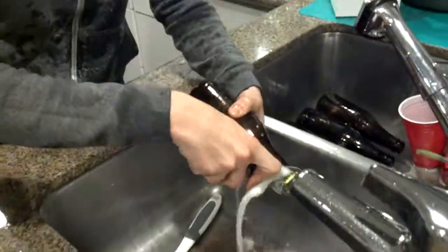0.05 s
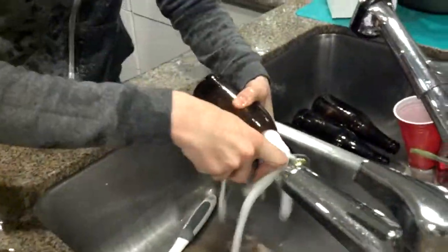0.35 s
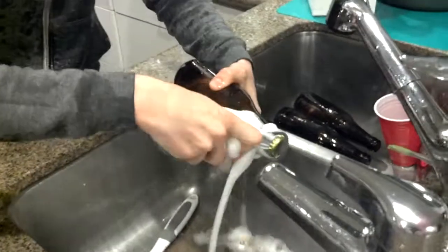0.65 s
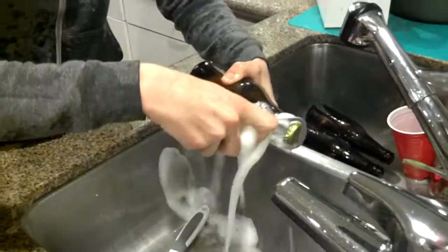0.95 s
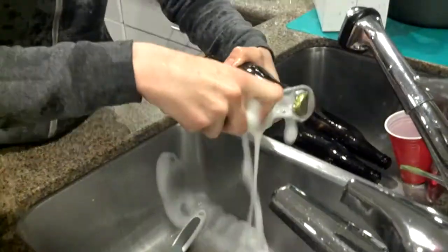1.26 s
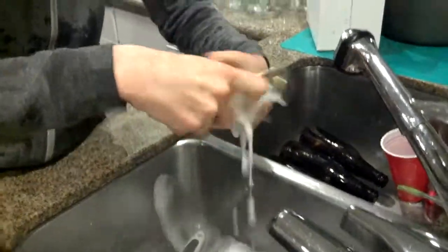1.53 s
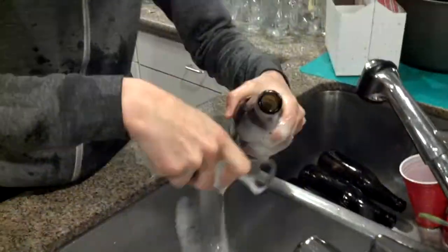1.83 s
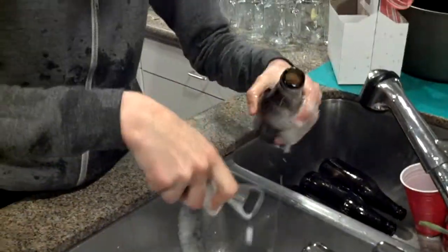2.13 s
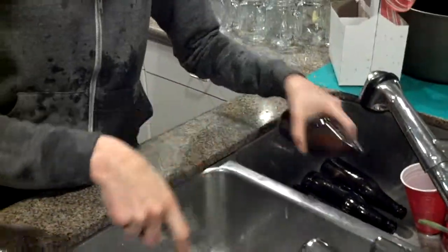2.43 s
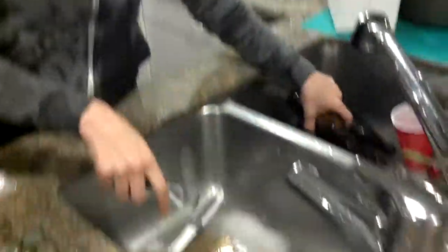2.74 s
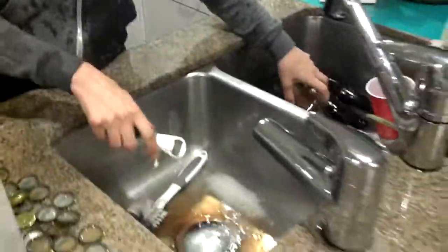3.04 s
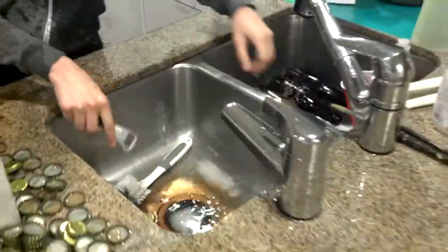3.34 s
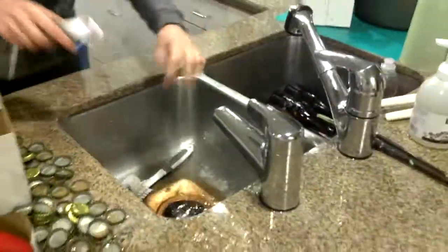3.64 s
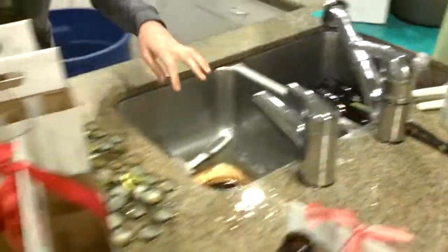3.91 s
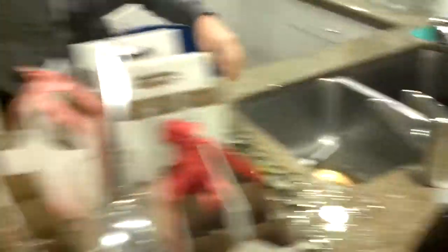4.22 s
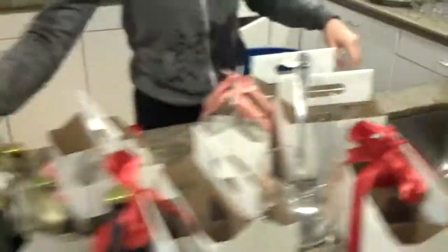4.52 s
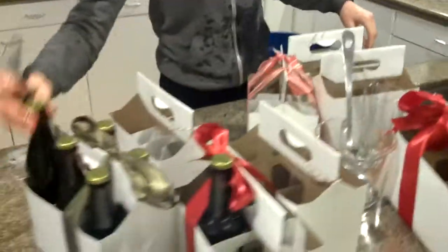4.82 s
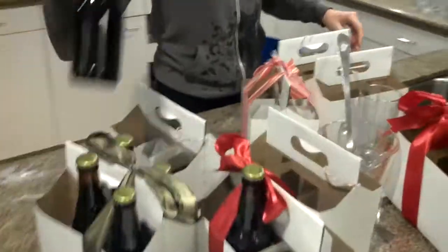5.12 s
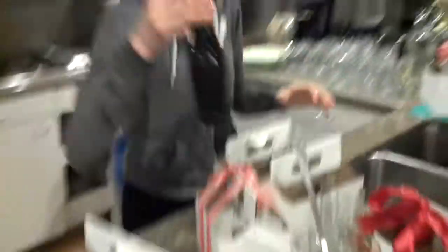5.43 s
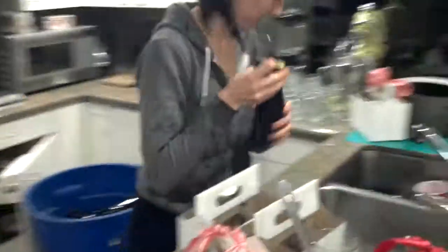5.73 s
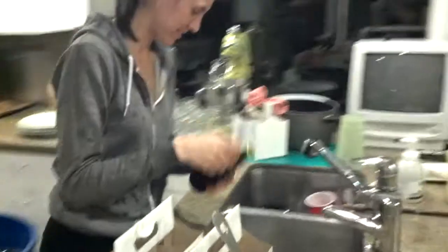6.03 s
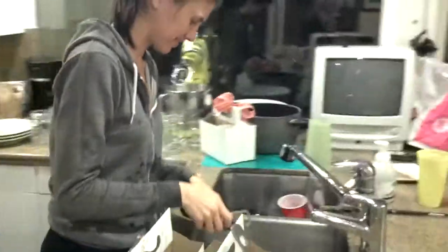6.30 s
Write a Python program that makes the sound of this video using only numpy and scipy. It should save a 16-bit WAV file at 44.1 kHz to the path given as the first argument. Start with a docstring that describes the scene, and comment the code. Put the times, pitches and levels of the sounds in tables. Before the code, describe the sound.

From the start, gas hisses past the cap of an over-carbonated glass bottle, close by, while a thin stream splatters into a steel sink. Gushes drum on the metal at about 0.7, 1.0 and 1.3 seconds, with spits of gas and a wetter surge of hiss. At 1.5 seconds the cap pops off sharply and the hiss stops. From 1.9 to 2.7 seconds the cap bounces and rings around the basin while foam fizzes softly. Between 2.7 and 3.4 seconds the bottle knocks and rocks loudly on other bottles, the basin ringing beneath, and the fizz fades. The rest is quieter: sleeves brush and tap cardboard cartons from about 4.5 seconds, a full bottle clinks at 4.7, an opener taps its neck at 5.8, then skids and bites on the cap at 6.2 and 6.4. The stereo is wide, with short small-kitchen reverberation.

```python
"""Foaming bottle over a steel sink.

An over-carbonated bottle is eased open: gas jets past the cap and overflow drums on the steel.
The cap pops off and bounces in the basin. The foaming bottle knocks and rocks on a pile of others.
A full one is lifted from its carton and an opener clinks on its neck, all in a small kitchen.
The microphone pair is widened by a delayed, inverted crossfeed."""
import sys
import numpy as np
from scipy import signal
from scipy.fft import rfft, irfft, next_fast_len
from scipy.io import wavfile

SR = 44100
rng = np.random.default_rng(int(sys.argv[2]) if len(sys.argv) > 2 else 0)


def store_pcm(level_fs):
    """Save levels as 16-bit WAV."""
    pcm = np.round(np.clip(level_fs, -1, 1) * 32767).astype(np.int16)
    wavfile.write(sys.argv[1], SR, np.atleast_2d(pcm).T)


N = 285106
TIME_S = np.arange(N) / SR
EDGES_HZ = 28 * 2 ** (np.arange(24) * .4)
CENTRES_HZ = np.sqrt(EDGES_HZ[1:] * EDGES_HZ[:-1])
POP_S = 1.4898

# Noise spectra: freq_hz, density_db
AIR_SPECTRUM = [(50, -8), (260, 6), (700, -17), (2000, -17), (6000, -32), (16000, -32)]
CLOTH_SPECTRUM = [(40, -30), (130, 0), (500, -5.5), (2000, -19.5), (16000, -35)]
THUD_SPECTRUM = [(50, -4), (200, 7), (600, -12), (1200, -6.5), (2500, -6.5), (6000, -32), (16000, -20)]
TICK_SPECTRUM = [(60, -4), (220, 12), (1000, -11), (2600, -5), (3500, 2.5), (8000, 4.5), (16000, -10)]
GLASS_SPECTRUM = [(1000, -35), (3500, -10), (8000, -3), (15000, 0)]
SINK_SPECTRUM = [(40, -38), (85, -16), (160, 12), (370, -2), (520, 4.5), (700, -4.5), (1250, 1.5),
                 (2000, -10.5), (4200, -5.5), (11000, -18), (16000, -35)]
LANDING_SPECTRUM = [(70, -40), (175, 0), (350, -6), (550, 4), (950, -5), (1300, -1), (1900, -9), (7500, -8),
                    (16000, -19)]
FROTH_SPECTRUM = [(200, -5.5), (800, -15), (2000, -3.5), (4200, 4.5), (7000, 2), (10000, -0.5),
                  (15500, -15)]
DRUM_SPECTRUM = [(50, -44), (90, -23), (140, 3), (400, -20), (2000, -49.5)]
SPLATTER_SPECTRUM = [(450, -35), (780, 0), (1200, -31.5), (4000, -61)]
JET_SPECTRUM = [(100, -24), (400, 0), (750, -3.5), (1100, -8), (1500, -0.5), (2200, -5.5), (4200, 0.5),
                (7000, -1), (10000, -2.5), (15500, -11)]
POP_SPECTRUM = [(60, -26.5), (200, -15), (600, -10), (1300, 1), (2500, -1.5), (4500, -1.5), (8500, -11),
                (16000, -13)]

# Blows: start_s, level_db, bass_db, treble_db
POP_BLOWS = [(.761, -25.5, 3, -7), (1.345, -29.5, -5, -5.5), (1.486, -25, 0, -8), (1.4898, -16.5, -10, -2),
             (1.5185, -22.5, -6, -17)]
PILE_KNOCKS = [(2.740, -20.5, 5, 1), (2.783, -23, -3, 6), (2.795, -21.5, -3, -3), (2.826, -21, 3, -6),
               (2.912, -22, -1, -9.5), (3.009, -15, -6, -3), (3.036, -13, -14, -6.5), (3.092, -21.5, 16, 4),
               (3.267, -25, -11, -5.5), (3.289, -32.5, -13, 2), (3.363, -34, 0, -12),
               (3.527, -42.5, -11, -8), (3.962, -47, -24, -19)]
BODY_CLINKS = [(4.706, -42.5, -2, -3), (4.714, -46.5, -4, -2)]
NECK_CLINKS = [(5.769, -44, 4, 1.9)]
OPENER_HOOK, OPENER_BITE = (6.152, -34, -2, -4), (6.389, -39, -2, 4)
# Bottle rocking on the pile: start_s, level_db, bass_db, treble_db, loss_per_touch_db
PILE_ROCKS = [(2.757, -17, -1, -9, 7.5), (3.135, -21.5, 2, -7, 5.2), (3.320, -28.5, -6, -11, 1.5)]
# Cap landings: start_s, level_db, treble_db, drain_share, cap_ring_db, flat_share
CAP_LANDINGS = [(1.912, -20.5, 0, 0, -8, .6), (1.952, -32, 5, .1, -3, .6), (2.144, -27, -1, .3, -2, .1),
                (2.200, -31.5, -3.5, .5, -1, .3), (2.255, -45, 3, .5, 8, .05), (2.373, -32, -3, .7, -2, .6),
                (2.383, -36, -2, .7, 10.5, 1), (2.442, -33, -5, 1, 1, .7), (2.666, -36, 1, .4, -6, .5)]
# Carton taps, soft low thumps: start_s, level_db
CARTON_TAPS = [(4.568, -55), (5.502, -47), (5.942, -51.5)]
SOFT_THUMPS = [(5.322, -69.5), (6.048, -62)]

# Sleeves brushing cartons: peak_s, level_db, length_s
BRUSH_STROKES = [(4.603, -63, 0.47), (4.85, -56.5, 0.66), (5.325, -58, 0.28), (5.54, -54, 0.61),
                 (6.012, -51.5, 0.35), (6.19, -53, 0.66)]
# Foam at the neck, then from the tipped bottle: peak_s, level_db, rise_s, fall_s
FOAM_SWELLS = [(1.4, -45.5, 1.62, 1.52), (2.68, -46.5, 1.1, .63)]
# Gushes landing on the steel: peak_s, level_db
OVERFLOW_GUSHES = [(.73, -34), (.95, -44), (1.32, -43)]
# First thin stream, fading as foam covers the steel: time_s, level_db
STREAM_ENVELOPE = [(0, -66.5), (.25, -56), (.6, -75.5)]

# Modes of steel and glass: pitch_hz, level_db, t60_s
OPENER_MODES = [(660, -7, 0.12), (3320, -3, 0.09), (3600, -1, 0.1), (4590, -12, 0.13), (6000, -7, 0.08),
                (6834, -6, 0.1), (9900, -7.5, 0.079)]
SEATED_CAP_MODES = [(3660, -4, 0.1), (4450, -2, 0.06), (4680, 1, 0.05), (6000, -8, 0.1)]
EMPTY_BOTTLE_MODES = [(2925, -7, 0.08), (3005, -9, 0.08), (3500, -15, 0.16), (4200, -15, 0.17),
                      (4550, -18, .18), (5260, -15, 0.12), (6940, -19, 0.08)]
PILE_BASIN_MODES = [(117, -13, 0.16), (166, -13, 0.38), (192, -13, .3), (303, -8.5, 0.42), (460, -10, .2),
                    (490, -10, 0.18), (528, -9, 0.17), (930, -11, 0.16), (1098, -15, .14), (1212, -9, 0.15),
                    (1315, -2.5, 0.08), (1715, -14, .1)]
# Full bottle: pitch_hz, body_hit_db, neck_hit_db, t60_s
FULL_BOTTLE_MODES = [(1970, -11, 2, 0.045), (2013, -19, -15, 0.8), (3060, -10, -19, 0.45),
                     (3535, -3, -7, 0.38), (4581, -3, -37, 0.44), (6270, -6, -20, 0.14),
                     (6980, -8, -1, 0.09), (7270, -14, 4, 0.055), (7768, -10, -14, .13),
                     (9722, -18, -4, 0.055), (10470, -19, 0, .04)]
# Basin under the cap: pitch_hz, side_hit_db, drain_hit_db, t60_s
CAP_BASIN_MODES = [(178, -8, -15, .33), (301, -10, -14, .36), (528, -3, -9, .25), (655, -13, 6, .1),
                   (883, -3, -16, .14), (1160, -9, -2, .08), (1350, -1, -7, .06)]
# Loose cap: pitch_hz, edge_hit_db, flat_hit_db, t60_s
LOOSE_CAP_MODES = [(3480, -10, -9, 0.14), (3965, -18, -3, 0.055), (4253, -5, -20, .09),
                   (6720, -15, -19, .15), (7120, -14, -15, 0.17)]
# Resonances of the drummed steel and the cap gap: centre_hz, width_hz, gain_db
STEEL_PEAKS = [(185, 16, 3), (257, 16, 9)]
GAP_PEAKS = [(4180, 450, -6)]

# Room decay: freq_hz, t60_s
KITCHEN_DECAY = [(150, 0.36), (1000, 0.51), (4000, 0.32), (9000, .27), (16000, 0.48)]
# Likeness of the microphone ports: freq_hz, correlation
PORT_CORRELATION = [(500, 1), (1200, 0.56), (2500, 0.28), (6000, 0.074)]
# Sensitivity mismatch: freq_hz, left_minus_right_db
PORT_BALANCE = [(150, 6), (600, 3.5), (1300, 2), (2500, 14.5), (8000, 10), (16000, -1)]
CHANNEL_BALANCE = [(170, 0), (450, -1.8), (1150, -1.5), (1700, -4), (2700, -1.2)]
# Feed from the opposite channel: freq_hz, gain_db
CROSSFEED_GAIN = [(150, -2), (600, 1), (1300, 3.5), (2500, -0.5), (6000, 1.5), (14000, -0.5)]


def from_db(db):
    """Decibels to gain."""
    return 10 ** (np.asarray(db) / 20)


def at_hz(points, hz):
    """Curve value on a log-frequency axis."""
    knots_hz, values = np.transpose(points)
    return np.interp(np.log(hz + 1e-9), np.log(knots_hz), values)


def in_time(points):
    """Piecewise-linear envelope."""
    return np.interp(TIME_S, *np.transpose(points))


def drift(rate_hz):
    """Random wander, spread about 1."""
    knots = rng.standard_normal(4000)
    return np.interp(TIME_S * rate_hz, np.arange(len(knots)), knots)


def swells(rows, floor_db=-120):
    """Power sum of swells; rise_s and fall_s each span 20 dB."""
    gains = [from_db(db - 20 * np.maximum((peak_s - TIME_S) / rise_s, (TIME_S - peak_s) / fall_s))
             for peak_s, db, rise_s, fall_s in rows]
    return np.sqrt(from_db(floor_db) ** 2 + np.sum(np.square(gains), axis=0))


def add(out, start_s, sound):
    """Mix a stereo sound into out."""
    start = round(start_s * SR)
    out[:, start:start + sound.shape[1]] += sound[:, :N - start]


def noise_bands():
    """Adjoining stereo noise bands, rms 1, ports alike in the bass."""
    size = next_fast_len(N, True)
    hz = np.arange(size // 2 + 1) * SR / size
    white = rfft(rng.standard_normal((2, size)))
    alike = np.clip(at_hz(PORT_CORRELATION, hz), 0, .999)
    mid, side = np.sqrt((1 + alike) / 2) * white[0], np.sqrt((1 - alike) / 2) * white[1]
    ports = np.array([mid + side, mid - side], np.complex64)
    bands = [irfft(ports * ((hz >= low) & (hz < high)), size)[:, :N]
             for low, high in zip(EDGES_HZ, EDGES_HZ[1:])]
    return [band / band.std() for band in bands]


def band_gains(spectrum):
    """Gain per band, total power 1."""
    gains = from_db(at_hz(spectrum, CENTRES_HZ)) * np.sqrt(CENTRES_HZ)
    return gains / np.linalg.norm(gains)


def coloured(bands, spectrum):
    """Steady shaped noise."""
    return sum(float(gain) * band for gain, band in zip(band_gains(spectrum), bands))


def resonate(x, peaks):
    """Add narrow resonances."""
    return x + sum(from_db(db) * signal.lfilter(*signal.iirpeak(hz, hz / width_hz, fs=SR), x)
                   for hz, width_hz, db in peaks)


def blow_gain(blow, hz):
    """Heavy blows carry more bass, hard ones more treble."""
    _, level_db, bass_db, treble_db = blow
    return from_db(level_db + at_hz([(250, bass_db), (1200, 0), (5500, treble_db)], hz))


def rebounds(blow, gap_s, loss_db, count, slowing=1):
    """A blow and its weaker after-touches."""
    start_s, level_db, bass_db, treble_db = blow
    return [(start_s + gap_s * k ** slowing, level_db - loss_db * k, bass_db, treble_db)
            for k in range(count)]


def clatter(bands, blows, spectrum, t60_1khz_s, bass_hold, build_s=.0002):
    """Dense modes of a struck body: decaying noise bands, the low ones longest."""
    out, t = np.zeros((2, N)), TIME_S[:SR // 4]
    for hz, gain, band in zip(CENTRES_HZ, band_gains(spectrum), bands):
        t60_s = t60_1khz_s * (1000 / hz) ** bass_hold
        attack = 1 - np.exp(-t / (1 / hz + build_s))
        envelope = gain * from_db(-60 * t / t60_s) * attack
        for blow in blows:
            grain = band[:, round(blow[0] * SR):][:, :len(t)]
            add(out, blow[0], blow_gain(blow, hz) * grain * envelope[:grain.shape[1]])
    return out


def ringing(blows, modes, scatter_db, detune=0):
    """Distinct modes; strength varies per blow, contact load shifts the pitch."""
    out, t = np.zeros((2, N)), TIME_S[:SR // 2]
    for hz, mode_db, t60_s in modes:
        spread_rad = np.arccos(np.clip(at_hz(PORT_CORRELATION, hz), 0, 1)) / 2
        envelope = from_db(mode_db - 60 * t / t60_s) * (1 - np.exp(-2 * t * hz))
        for blow, (size, phase, angle, load) in zip(blows, rng.standard_normal((len(blows), 4))):
            port_rad = np.pi * phase + spread_rad * angle * np.array([[1], [-1]])
            wave = np.cos(2 * np.pi * hz * (1 + detune * load) * t + port_rad)
            add(out, blow[0], blow_gain(blow, hz) * from_db(scatter_db * size) * envelope * wave)
    return out


def ringing_between(blows, shares, modes, detune):
    """Modes with two sets of levels, blended by each blow's share (0-1)."""
    hz, first_db, second_db, t60_s = np.transpose(modes)
    levels_db = first_db + np.clip(shares, 0, 1)[:, None] * (second_db - first_db)
    return sum(ringing([blow], zip(hz, db, t60_s), 1, detune) for blow, db in zip(blows, levels_db))


def kitchen_reverb(x, bands, build_s=.024):
    """Diffuse tail from hard walls and counters."""
    t = TIME_S[:SR * 3 // 5]
    tail = sum(band[:, :len(t)] * np.sqrt(hz) * from_db(-60 * t / at_hz(KITCHEN_DECAY, hz))
               for hz, band in zip(CENTRES_HZ, bands))
    tail *= np.clip(t / build_s, 0, 1)
    return signal.fftconvolve(x, tail / np.sqrt(np.sum(tail ** 2) / 2), axes=1)[:, :N]


def rustle(bands, rise_share=.52):
    """Sleeves and cartons brush in uneven strokes."""
    strokes = [(peak_s, db, length_s * rise_share, length_s * (1 - rise_share))
               for peak_s, db, length_s in BRUSH_STROKES]
    return swells(strokes, floor_db=-76) * from_db(2.5 * drift(40)) * coloured(bands, CLOTH_SPECTRUM)


def carton_bumps(bands):
    """Light taps on cartons and soft low thumps."""
    taps = [(start_s, db, -15, -9.5) for start_s, db in CARTON_TAPS]
    thumps = [(start_s, db, 24, 2) for start_s, db in SOFT_THUMPS]
    return from_db(3) * clatter(bands, taps + thumps, THUD_SPECTRUM, t60_1khz_s=.11, bass_hold=.38)


def contact_ticks(bands, blows):
    """Bright noise of light, hard contacts."""
    ticks = clatter(bands, blows, TICK_SPECTRUM, t60_1khz_s=.1, bass_hold=.26, build_s=.0022)
    return from_db(-.5) * ticks


def full_bottle(bands):
    """The full bottle's body clinks as it is lifted, then the opener taps its neck."""
    hz, body_db, neck_db, t60_s = np.transpose(FULL_BOTTLE_MODES)
    body = ringing(BODY_CLINKS, zip(hz, body_db, t60_s), scatter_db=.72, detune=.002)
    neck = ringing(NECK_CLINKS, zip(hz, neck_db, t60_s), scatter_db=1)
    crack = clatter(bands, NECK_CLINKS, GLASS_SPECTRUM, t60_1khz_s=.065, bass_hold=.1, build_s=.001)
    return from_db(-3.5) * (body + neck) + from_db(.3) * crack + contact_ticks(bands, BODY_CLINKS)


def opener(bands):
    """The opener skids on a seated cap, then bites and chatters ever more slowly."""
    skid = rebounds(OPENER_HOOK, gap_s=.01, loss_db=8, count=3)
    chatter = rebounds(OPENER_BITE, gap_s=.011, loss_db=3.6, count=4, slowing=1.75)
    lever = ringing(chatter, OPENER_MODES, scatter_db=1.2, detune=.006)
    crown = ringing(skid, SEATED_CAP_MODES, scatter_db=1.5, detune=.02)
    return from_db(-2.5) * lever + from_db(-1.5) * crown + contact_ticks(bands, skid + chatter)


def bottle_pile(bands):
    """The bottle knocks and rocks on the others; the basin rings beneath."""
    rocks = []
    for *blow, loss_db in PILE_ROCKS:
        rocks += rebounds(blow, gap_s=.043, loss_db=loss_db, count=3)
    crash = clatter(bands, PILE_KNOCKS, SINK_SPECTRUM, t60_1khz_s=.115, bass_hold=.32, build_s=.0006)
    roll = clatter(bands, rocks, SINK_SPECTRUM, t60_1khz_s=.13, bass_hold=.28, build_s=.004)
    steel = ringing(PILE_KNOCKS + rocks, PILE_BASIN_MODES, scatter_db=2, detune=.013)
    glass = ringing(PILE_KNOCKS + rocks, EMPTY_BOTTLE_MODES, scatter_db=3.2, detune=.016)
    return from_db(.5) * (crash + roll) + from_db(-4) * steel + from_db(-3.5) * glass


def bouncing_cap(bands, rim_lead_s=.003, rim_loss_db=5, drain_bass_db=-13):
    """The cap bounces, rim first, towards the drain, where the steel is stiffer."""
    start_s, level_db, treble_db, drain_share, ring_db, flat_share = np.transpose(CAP_LANDINGS)
    bass_db = drain_bass_db * drain_share
    landings = np.transpose([start_s, level_db, bass_db, treble_db])
    rims = np.transpose([start_s - rim_lead_s, level_db - rim_loss_db, bass_db, treble_db])
    cap_blows = np.transpose([start_s, level_db + ring_db, bass_db, treble_db])
    crash = clatter(bands, [*rims, *landings], LANDING_SPECTRUM,
                    t60_1khz_s=.098, bass_hold=.21, build_s=.001)
    steel = ringing_between(landings, drain_share, CAP_BASIN_MODES, detune=.004)
    crown = ringing_between(cap_blows, flat_share, LOOSE_CAP_MODES, detune=.002)
    return from_db(1.5) * crash + from_db(-.5) * steel + crown


def bubbles(rate_per_s, size_db, t60_cycles):
    """Tiny bubbles burst at random, each a damped ping; rms 1."""
    out = np.zeros((2, N))
    for hz in np.geomspace(2500, 12000, 12):
        sizes = from_db(size_db * np.minimum(rng.exponential(1, N), 5))
        bursts = rng.random(N) < rate_per_s / 12 / SR
        kicks = sizes * bursts * rng.standard_normal((2, N)) + 1e-18
        radius, step_rad = from_db(-60 * hz / (t60_cycles * SR)), 2 * np.pi * hz / SR
        pings = signal.lfilter([1, 0, -1], [1, -2 * radius * np.cos(step_rad), radius ** 2], kicks)
        out += pings / pings.std() * from_db(at_hz(FROTH_SPECTRUM, hz)) * np.sqrt(hz)
    return out / out.std()


def foam(bands, fizz):
    """Heads of foam build and collapse."""
    froth = from_db(-2.5) * coloured(bands, FROTH_SPECTRUM) + from_db(-5.5) * fizz
    return swells(FOAM_SWELLS, floor_db=-79) * froth


def gap_flow_db(creep_db_per_s=3, opening_s=.2):
    """The gap under the cap opens quickly, then creeps wider."""
    return -47.5 + creep_db_per_s * TIME_S - 6 * np.exp(-TIME_S / opening_s)


def fade_after_pop(db_per_s):
    """Gain that falls once the cap is off."""
    return from_db(-db_per_s * np.maximum(TIME_S - POP_S, 0))


def overflow(bands, flow_db, rise_s=.06, fall_s=.12):
    """A thin stream splatters hollowly, gushes drum on the steel, then all drains away."""
    gushes = swells([(peak_s, db, rise_s, fall_s) for peak_s, db in OVERFLOW_GUSHES])
    pour = np.hypot(from_db(flow_db - 7), gushes) * from_db(2.5 * drift(25))
    drumming = resonate(coloured(bands, DRUM_SPECTRUM), STEEL_PEAKS) * pour
    splatter = coloured(bands, SPLATTER_SPECTRUM) * from_db(in_time(STREAM_ENVELOPE))
    return (drumming + splatter) * fade_after_pop(db_per_s=21)


def gas_jet(bands, fizz, flow_db, drying_db_per_s=7, flutter_db=2):
    """Gas jets past the cap: thinner as the neck clears, louder and lower as a foam plug passes."""
    plug = in_time([(.78, 0), (.95, 1), (1.048, 0)])
    level_db = flow_db + 5 * plug
    wet_db = -3 - drying_db_per_s * TIME_S + 18 * plug
    jet = 0
    for hz, gain, band in zip(CENTRES_HZ, band_gains(JET_SPECTRUM), bands):
        wet_share = at_hz([(500, .29), (1500, .96), (3500, .95), (7000, .23)], hz)
        jet += gain * band * from_db(level_db + wet_share * wet_db + flutter_db * drift(44.7))
    hiss = from_db(1.2) * resonate(jet, GAP_PEAKS) + from_db(level_db - 9) * fizz
    return hiss * fade_after_pop(db_per_s=500)


def pop(bands, pulse_hz=3300):
    """Spits of gas; the cap lets go with one sharp pressure pulse, then knocks as it falls just after."""
    out = from_db(-2.5) * clatter(bands, POP_BLOWS, POP_SPECTRUM, t60_1khz_s=.07, bass_hold=.19)
    phase = 2 * np.pi * pulse_hz * (TIME_S[:SR // 1000] - .0005)
    pulse = from_db(-5) * phase * np.exp(-phase ** 2 / 2)
    add(out, POP_S, np.array([pulse, pulse]))
    return out


def scene():
    """Hiss, foam and blows at the sink, handling further off; the blows excite the room."""
    steady = noise_bands()
    shifted = [np.roll(band, N // 2, axis=1) for band in steady]   # uncorrelated with steady
    fizz = bubbles(rate_per_s=1500, size_db=1.5, t60_cycles=.9)
    background = from_db(-64) * coloured(steady, AIR_SPECTRUM) + rustle(shifted)
    near = pop(shifted) + bouncing_cap(shifted) + bottle_pile(shifted)
    far = carton_bumps(shifted) + full_bottle(shifted) + opener(shifted)
    room = kitchen_reverb(from_db(-8.5) * near + from_db(-4) * far, steady)
    flow_db = gap_flow_db()
    leak = gas_jet(steady, fizz, flow_db) + overflow(steady, flow_db)
    return background + room + far + near + foam(steady, fizz) + leak


def record(dry, delay_samples=16, cutoff_hz=15900):
    """Unequal ports, delayed inverted crossfeed, unequal channels, steep low-pass."""
    size = next_fast_len(N + SR // 10, True)
    hz = np.arange(size // 2 + 1) * SR / size
    split = np.array([[.5], [-.5]])
    ports = rfft(dry, size) * from_db(at_hz(PORT_BALANCE, hz) * split)
    cross = from_db(at_hz(CROSSFEED_GAIN, hz)) * np.exp(-2j * np.pi * hz * delay_samples / SR)
    balance = from_db(-2.2 + at_hz(CHANNEL_BALANCE, hz) * split)
    wide = irfft(balance * (ports - cross * ports[::-1]), size)[:, :N]
    return signal.sosfilt(signal.ellip(12, .2, 80, cutoff_hz, fs=SR, output="sos"), wide)


dry = scene()
out = record(dry)
store_pcm(out)
```